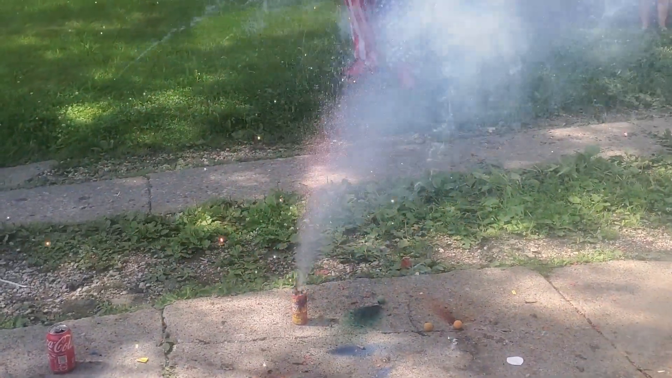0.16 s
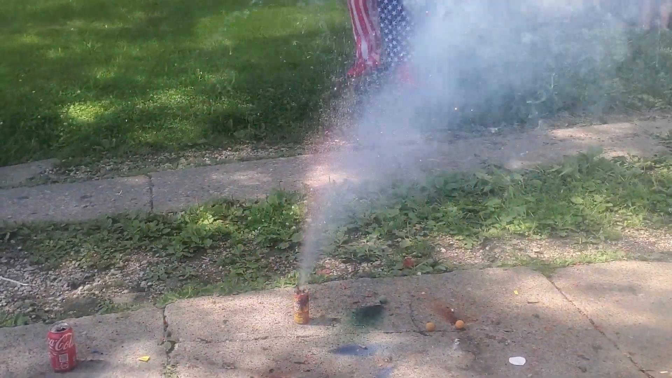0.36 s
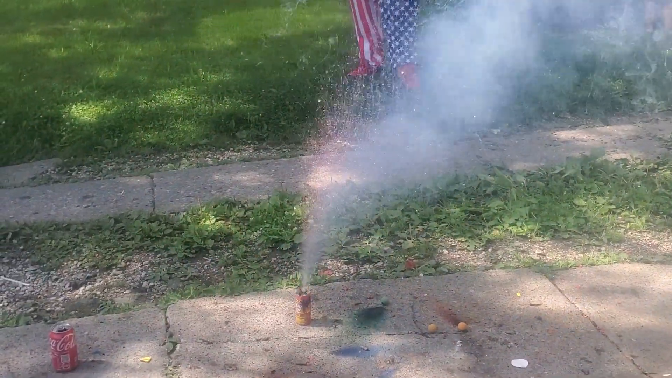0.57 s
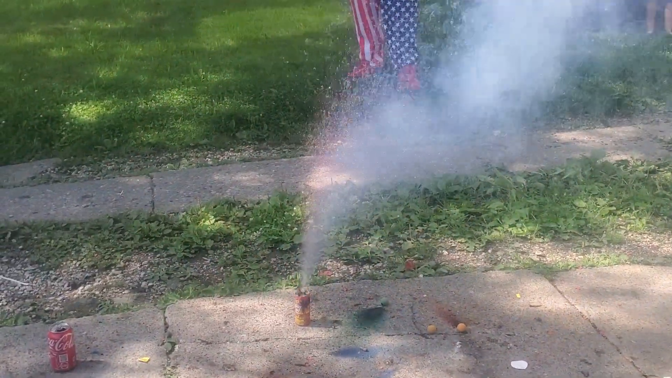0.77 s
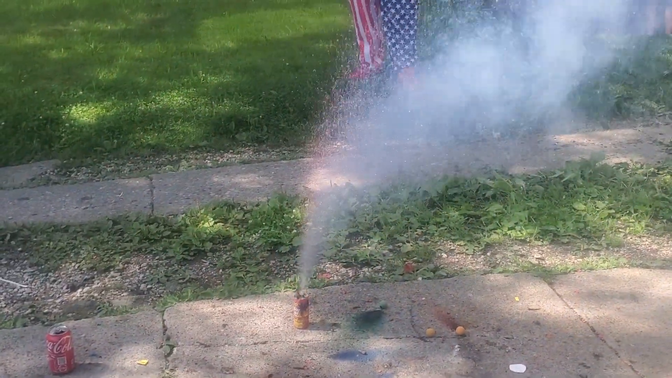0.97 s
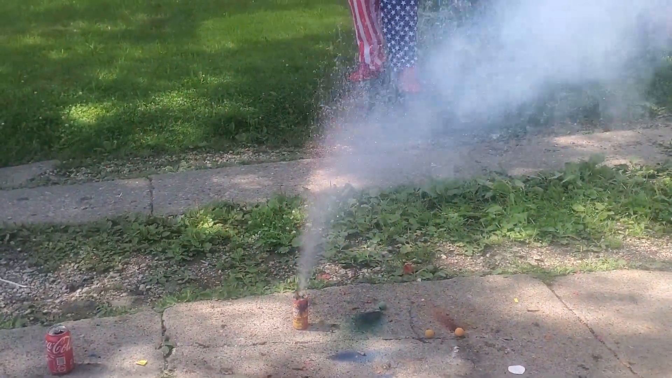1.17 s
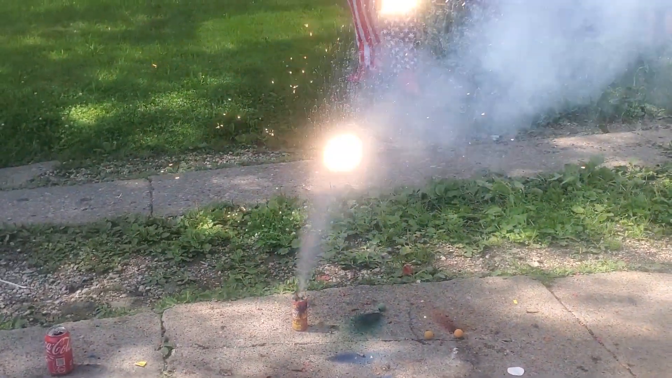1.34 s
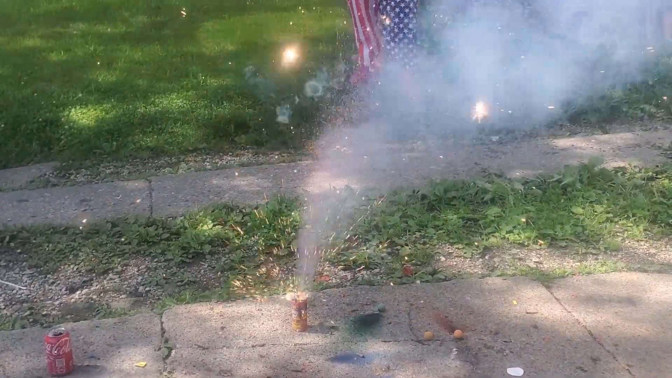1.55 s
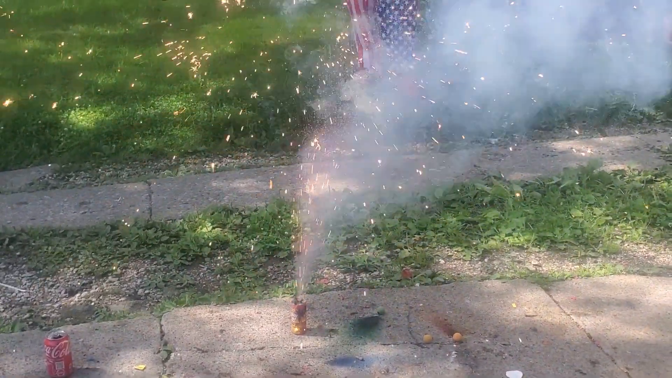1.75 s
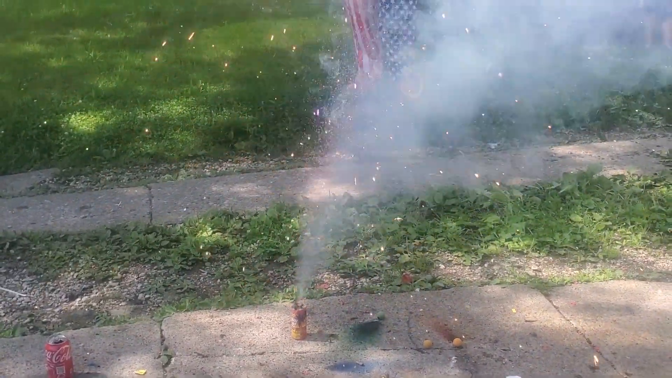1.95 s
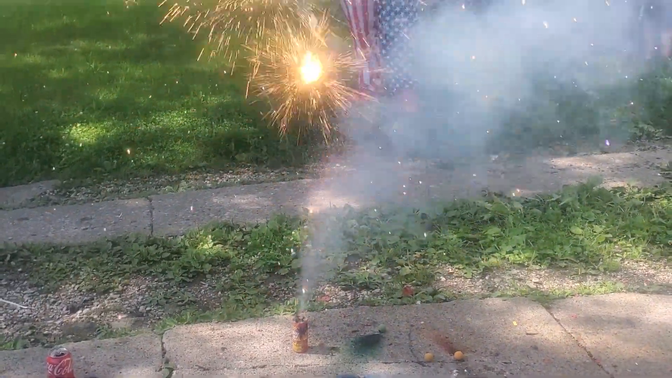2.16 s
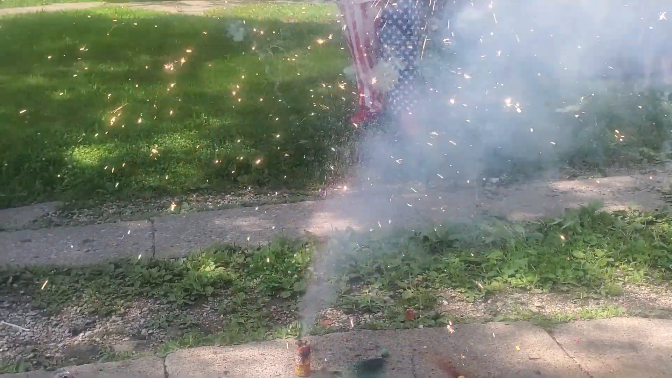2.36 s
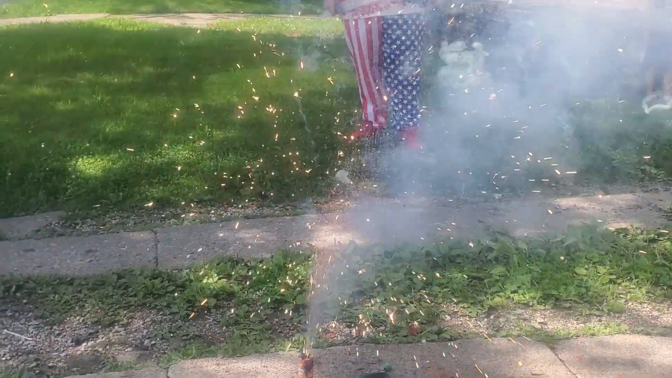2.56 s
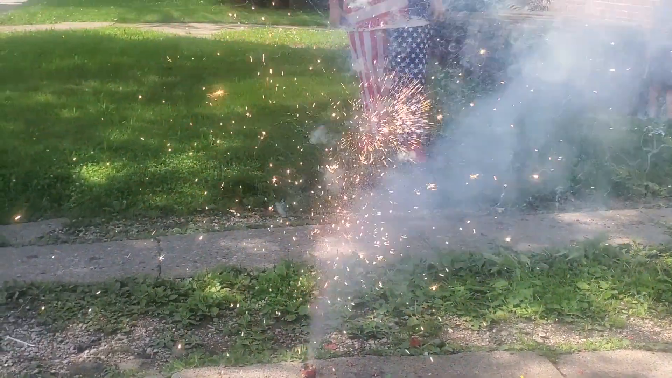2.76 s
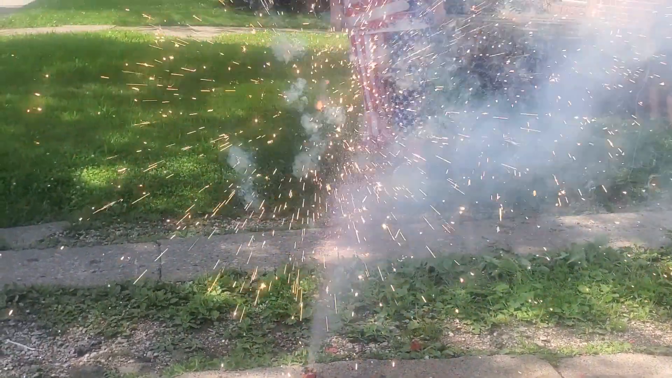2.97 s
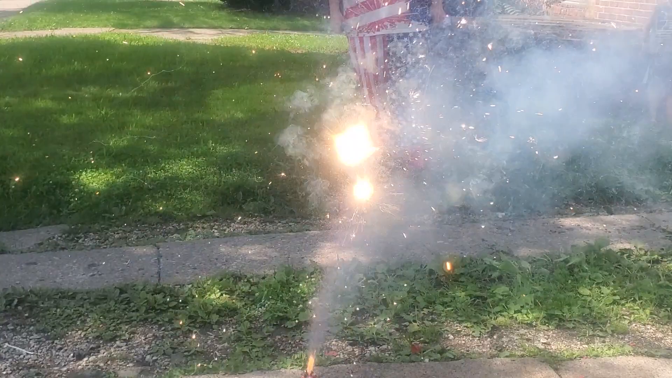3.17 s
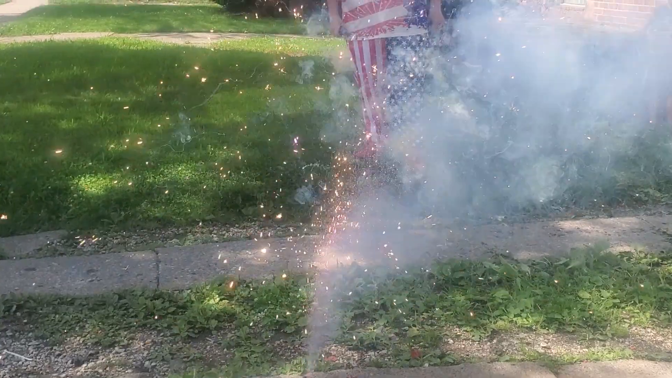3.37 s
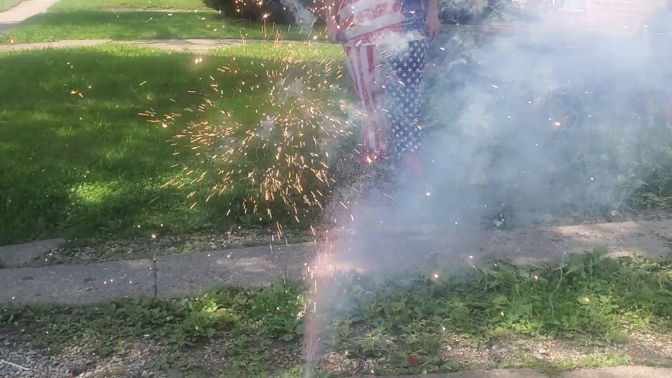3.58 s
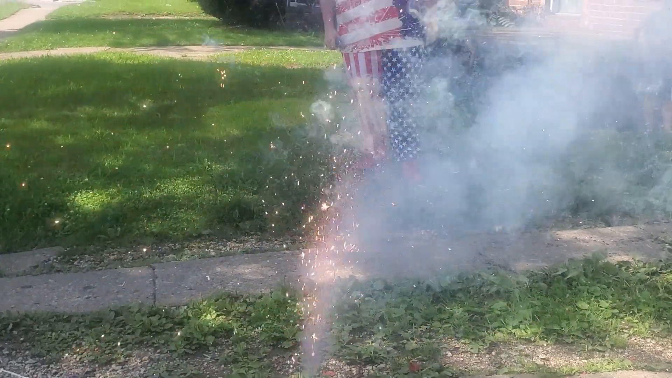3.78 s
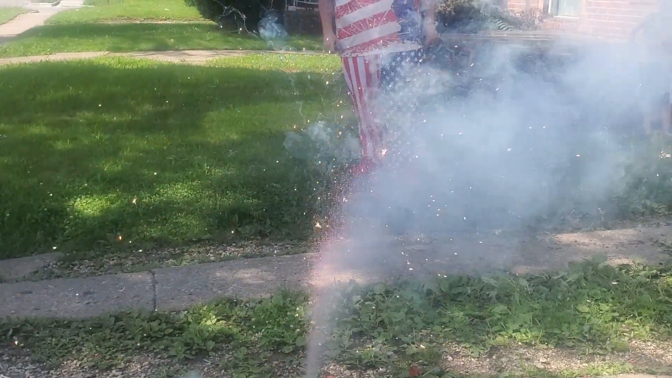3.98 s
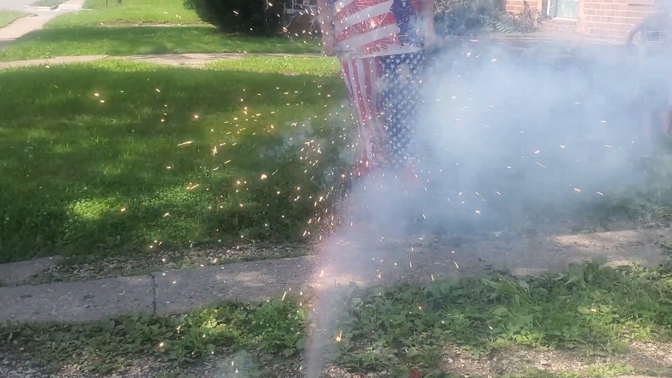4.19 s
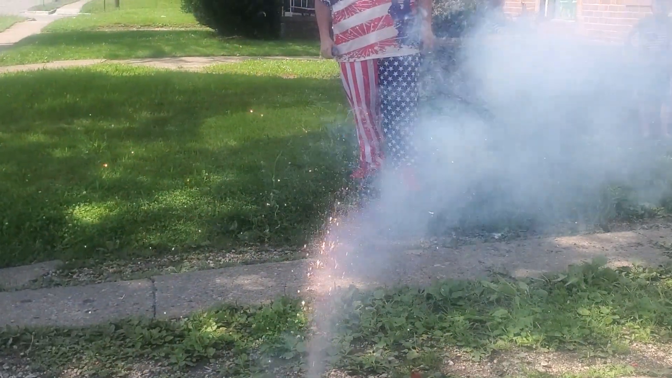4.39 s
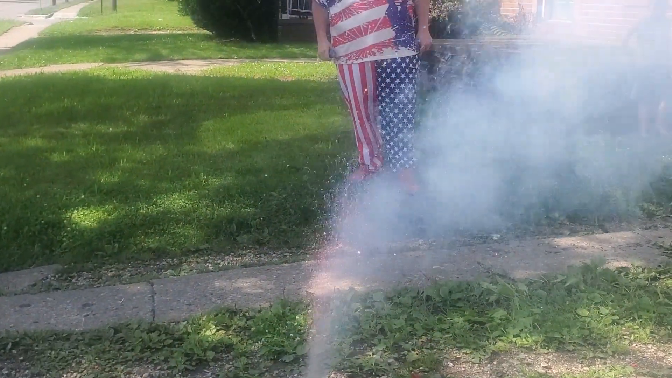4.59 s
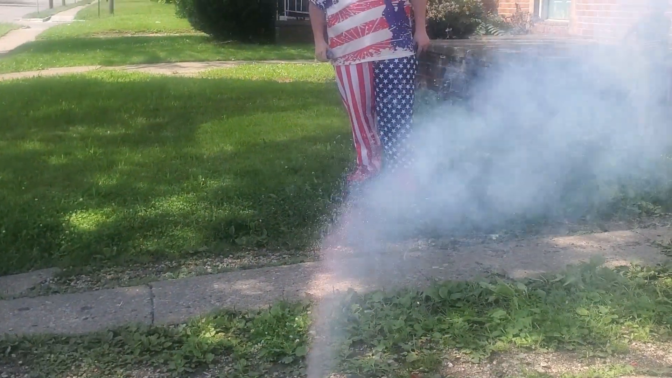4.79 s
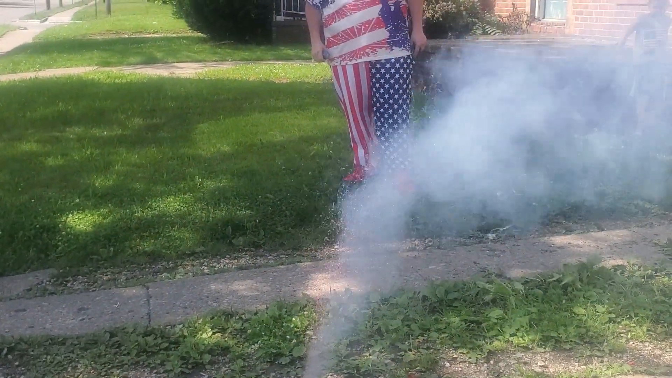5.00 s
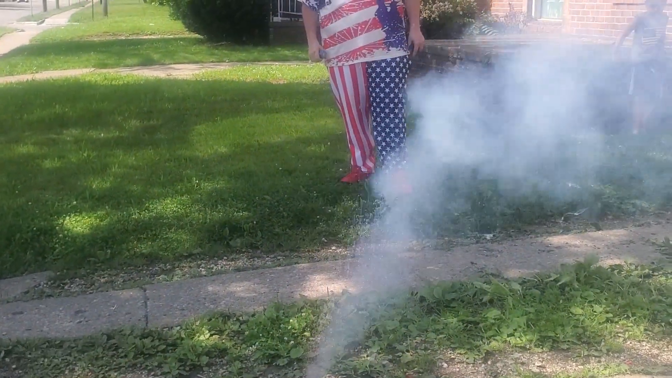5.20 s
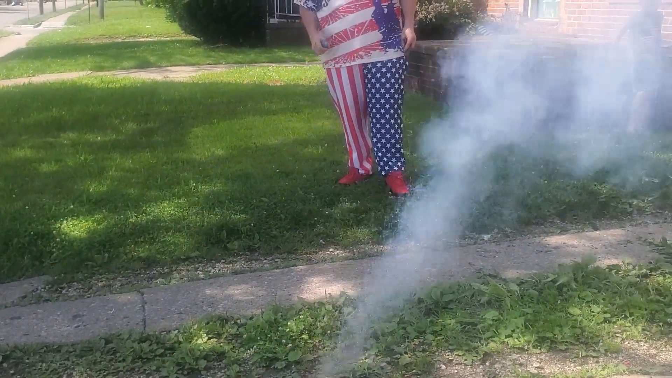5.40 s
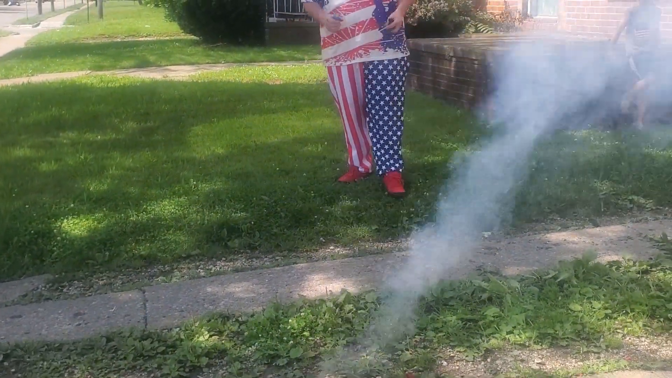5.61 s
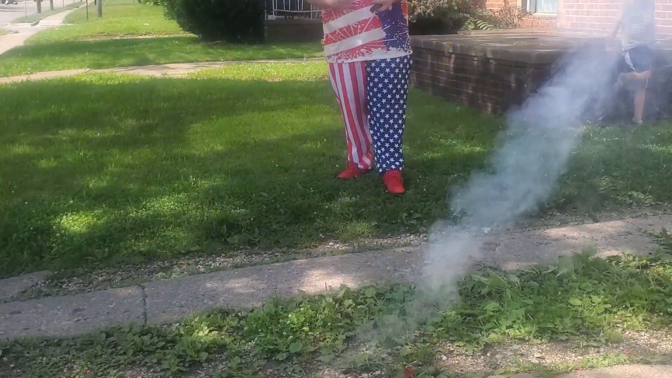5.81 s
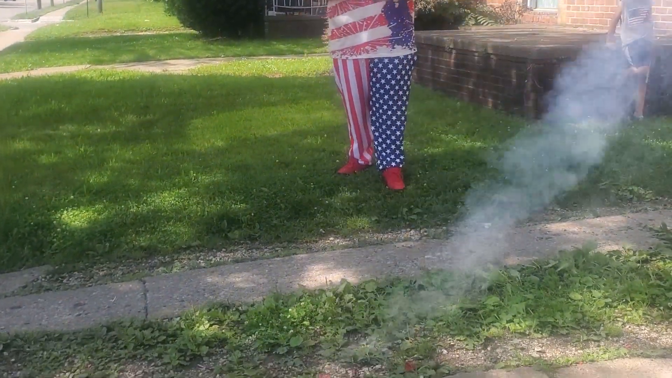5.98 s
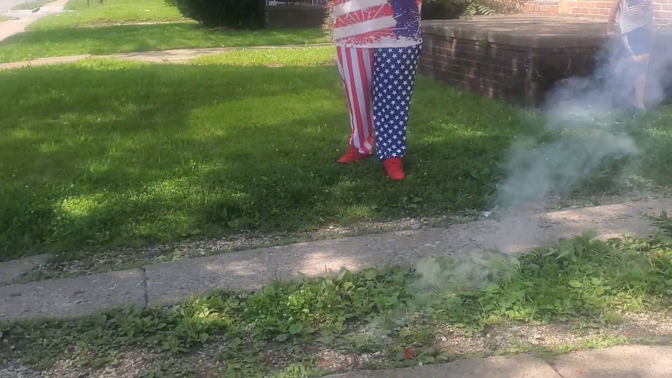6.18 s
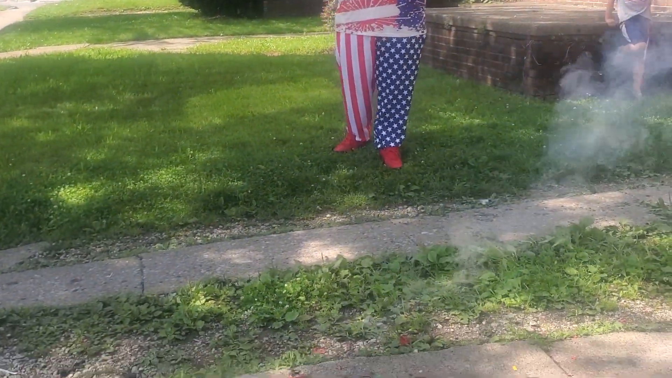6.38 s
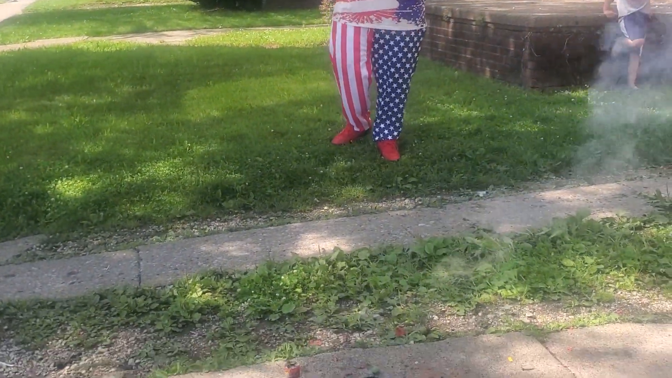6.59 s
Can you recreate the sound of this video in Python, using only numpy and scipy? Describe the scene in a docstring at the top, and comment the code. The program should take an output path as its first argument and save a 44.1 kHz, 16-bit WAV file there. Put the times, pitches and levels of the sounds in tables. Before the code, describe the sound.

Outdoors by a grassy yard, heard close on a small stereo microphone. At 0 s the tail of a pop and its tiny snaps fade into a thin, slightly sputtering gas hiss over faint street wash. Around 1.4 s the hiss jumps up, a brief vehicle hum swells beneath, and sharp, very loud star bursts begin. From 1.5 to 3.1 s they come in a dense, irregular crackling barrage, each a dry crack with a quick ground slap, scattered snaps and short yard echoes. From 3.2 s gaps widen; single pops continue until about 4.5 s. The hiss dulls, sinks after 5 s and vanishes by 5.5 s, with one faint late pop at 5.6 s. Tiny falling bird chirps sound between 5.3 and 5.9 s, with another at 6.3 s. Faint throbbing insects remain as a passing vehicle's low rumble and wavering two-tone engine hum rise from 5.5 s, strong from 5.9 s to the end at about 6.6 s.

```python
"""Small fountain firework with popping stars

A fountain firework hisses on a pavement (shaped noise) and throws up stars that burst in sharp pops
(short push and suction), each bounced by the ground and followed by small snaps and yard echoes.
Behind it are passing vehicles with two engine hums (sines), low rumble and street wash (noise),
insects (a throbbing narrow band) and a bird (sine glides).
Two microphone ports on a small housing colour the pops and the hiss differently left and right."""
import sys
import numpy as np
from scipy import signal
from scipy.fft import rfft, irfft
from scipy.io import wavfile
from scipy.ndimage import uniform_filter1d

SR = 44100
rng = np.random.default_rng(int(sys.argv[2]) if len(sys.argv) > 2 else 0)


def unload_audio(sound):
    """Save the sound as a 16-bit wav file, at the path given as the first command line argument."""
    columns = np.transpose(np.atleast_2d(sound))
    # keep every value between -1 and 1, then stretch to whole-number steps
    steps = np.round(np.clip(columns, -1, 1) * 32767)
    wavfile.write(sys.argv[1], SR, steps.astype(np.int16))


def level_to_linear(level):
    """Convert decibel levels to linear amplitude factors, elementwise."""
    exponent = np.asarray(level, float) / 20
    return 10 ** exponent


N = 293253
TIME = np.arange(N) / SR
LEAD = SR // 10  # samples played ahead of time zero, so that an earlier star leaves its tail
EDGE_HZ = 15900  # the noises and the yard echoes stop here

# loud bursting stars: t/s, level/dB before the pop is coloured, ground bounce delay/ms (longer if higher)
POPS = [(-0.03, -4.5, 1.8), (1.424, -4.5, 1.34), (1.4794, -3, 2.46), (1.5518, -9, 1.8), (1.59, -2.5, 2.04),
        (1.6146, -5, 1.73), (1.6725, -5, 1.7), (1.6822, -4, 3.7), (1.6983, -4, 1.7), (1.7077, -7.5, 2.9),
        (1.7168, -7, 1.8), (1.7385, -4, 2.31), (1.7516, -3.5, 3.9), (1.7627, -4, 1.6), (1.7945, -2, 1.6),
        (1.8029, -8.5, 3.4), (1.812, -4, 2.8), (1.817, -11.5, 2.8), (1.833, -5.5, 2.47),
        (1.859, -8.5, 2.36), (1.9045, -3.5, 1.2), (1.909, -6, 2.8), (1.9669, -7, 3), (1.9743, -6.5, 1.93),
        (1.9895, -2.5, 2.74), (2.0331, -6, 3.17), (2.0631, -8, 3.9), (2.0725, -7.5, 3.3),
        (2.0925, -6.5, 2.8), (2.1113, -7.5, 3.2), (2.125, -11, 2.1), (2.1589, -2, 3.3), (2.17, -3, 3.8),
        (2.2083, -5.5, 2.4), (2.2262, -9.5, 4), (2.2324, -6, 3.7), (2.2652, -7.5, 2.9), (2.2752, -3.5, 1.9),
        (2.2852, -1, 3.3), (2.3131, -2, 3.7), (2.3325, -4, 1.7), (2.378, -5, 3.1), (2.4028, -10, 1.5),
        (2.42, -5.5, 2.9), (2.4444, -4.5, 3.1), (2.4634, -7, 3.7), (2.49, -5.5, 3.1), (2.5513, -7, 3.7),
        (2.5635, -12.5, 2.6), (2.5775, -3.5, 3.4), (2.5957, -9, 2.9), (2.6104, -4.5, 3.7),
        (2.6389, -6, 1.8), (2.6496, -5.5, 1.56), (2.699, -2.5, 1.9), (2.7172, -8.5, 2.8), (2.7384, -7, 2),
        (2.7525, -6, 2.77), (2.7933, -7, 1.74), (2.8052, -9.5, 2.2), (2.814, -7, 1.7), (2.847, -5, 1.6),
        (2.884, -7.5, 1.7), (2.891, -8.5, 3.6), (2.9098, -8, 2.81), (2.9187, -7.5, 2.43), (2.9265, -8, 2.2),
        (2.9407, -4.5, 2.6), (2.9512, -6.5, 4.01), (2.9602, -5.5, 1.26), (2.9769, 0, 4.4),
        (2.9879, -6.5, 1.9), (3.0032, -5.5, 2.6), (3.0184, -3, 1.96), (3.0353, -5.5, 5.1), (3.051, -6, 2.8),
        (3.0666, -3, 2.8), (3.1114, -9, 2.6), (3.1403, -11, 4.2), (3.1638, -13, 2.6), (3.1729, -5, 1.73),
        (3.1995, -9.5, 3.6), (3.211, -6, 1.11), (3.276, -7.5, 3.6), (3.3087, -7, 2.2), (3.3364, -8, 1.54),
        (3.3723, -4, 2.85), (3.4108, -5, 3.14), (3.4536, -8.5, 2.1), (3.4662, -11, 2.8), (3.5203, -4, 2.04),
        (3.5577, -3, 3.1), (3.5928, -6.5, 1.3), (3.6014, -4, 4.1), (3.6762, -10, 1.9), (3.6974, -7, 1.7),
        (3.7187, -6.5, 2.5), (3.7268, -8, 1.81), (3.7452, -5.5, 2.61), (3.7472, -11, 2.3),
        (3.8167, -7.5, 1.8), (3.8285, -4, 1.85), (3.9119, -9, 2.5), (3.9395, -3, 1.41), (3.9837, -8, 2.4),
        (4.0104, -9.5, 3.8), (4.0262, -8, 2.14), (4.056, -1.5, 1.47), (4.1134, -5, 2.3), (4.2402, -8, 1.35),
        (4.2497, -7, 2.55), (4.2815, -2.5, 2.56), (4.425, -17, 1.7), (4.4695, -4.5, 4.44),
        (5.6051, -19, 1.66)]
# how alike left and right are, for the street and the yard: f/Hz, likeness (1 same, 0 unrelated, -1 opposite)
LIKENESS = [(60, 0.76), (240, 1), (950, 0.42), (3770, -0.41), (15000, 0.75)]
# two vehicles passing: t/s, level/dB of their rumble
TRAFFIC = [(0, -49), (1.1, -50), (1.4, -36), (1.7, -44.5), (4.2, -45.5), (5.25, -40.5), (5.5, -37),
           (5.9, -28), (6.65, -29)]


def evened(x):
    """Scales a signal to rms 1."""
    return x / np.sqrt(np.mean(x ** 2) + 1e-20)


def read(points, hz):
    """Reads a table of values over frequency, on a log-frequency axis."""
    f, value = np.transpose(points)
    return np.interp(np.log(hz + 1), np.log(f + 1), value)


def curve(rows, axis=1):
    """Reads one column of a table over time, at every sample."""
    return np.interp(TIME, np.transpose(rows)[0], np.transpose(rows)[axis])


def ports(hz, turn):
    """Each port sums delayed and dulled paths round the housing; the direction (turn) shifts the delays."""
    # paths from the front to each port: delay/ms, gain, top f/Hz, delay shift/ms for a turn of 1
    left_paths = [(-.068, .55, 16000, .003), (0, 1., 16000, .003)]
    right_paths = [(0.0041, 1., 6800, -0.021), (0.27, -1.104, 3270, 0.0059), (0.33, 0.53, 2900, -0.016),
                   (0.079, 0.49, 31000, -0.034)]
    responses = []
    for paths in (left_paths, right_paths):
        response = 0
        for ms, gain, top, spread in paths:
            delay = np.exp(-2j * np.pi * hz * (ms + spread * turn) / 1000)
            response = response + gain * delay / (1 + (hz / top) ** 4)
        responses.append(response)
    return np.array(responses)


def noise(spectrum, likeness, patchy_db, size=1024):
    """Makes two channels of random short-time spectra, with patches that drift in loudness."""
    hz = np.fft.rfftfreq(size, 1 / SR)
    a, b, c, d, patches = rng.standard_normal((4 * N // size + 5, len(hz), 5)).T
    patches = uniform_filter1d(patches, size=10, axis=0)  # over frequency
    patches = evened(uniform_filter1d(patches, size=8, axis=1))  # over time
    same = np.clip(read(likeness, hz), -1, 1)[:, None]
    left = a + 1j * b
    right = same * left + np.sqrt(1 - same ** 2) * (c + 1j * d)
    z = np.array([left, right])
    z *= level_to_linear(read(spectrum, hz)[:, None] + patchy_db * patches) * (hz < EDGE_HZ)[:, None]
    return hz, z


def sound(z, size=1024):
    """Turns short-time spectra back into sound of rms 1."""
    return evened(signal.istft(z, nperseg=size, noverlap=size * 3 // 4)[1][:, :N])


def bursts(rows, size=2048):
    """Each star is a blast wave (push, then suction), its duller ground bounce and a spatter of debris."""
    # colour of a pop: f/Hz, level/dB
    blast_colour = [(30, 9.5), (150, 17.5), (500, 15.5), (1500, 10), (4000, 11.5), (6300, 11.5),
                    (7500, 6.5), (9000, 10), (16000, 3.5)]
    ground_db, ground_spread_db = -3.5, 1  # bounce against the direct pop, and how much it varies
    s, db, bounce_ms = np.transpose(rows)[:, :, None]
    turn, tilt, stretch, ground = rng.standard_normal((len(rows), 4, 1)).transpose(1, 0, 2)
    hz, t = np.fft.rfftfreq(size, 1 / SR), np.arange(size) / SR

    def late(ms):
        """A delay turns the phase in step with frequency."""
        return np.exp(-2j * np.pi * hz * ms / 1000)

    suction_ms = .113 * np.exp(.14 * stretch)
    blast = (1 - .6 * late(suction_ms)) * late(20) * level_to_linear(read(blast_colour, hz))
    bounce_gain = level_to_linear(ground_db + ground_spread_db * ground.clip(-2, 2))
    bounce = bounce_gain * late(bounce_ms) / (1 + 1j * hz / 11000)
    from_below = ports(hz, tilt - 1.5)  # the bounce comes from another direction

    fade = level_to_linear(-24 - 60 * t / 0.036) * (t > .0003)
    debris = rng.standard_normal((len(rows), 2, size)) * fade
    # grit carries no bass
    spatter = rfft(debris).transpose(1, 0, 2) * ports(hz, -turn) * hz / (hz - 700j)

    waves = level_to_linear(db) * irfft(blast * (ports(hz, turn) + bounce * from_below + spatter))
    out = np.zeros((2, LEAD + N + size))
    # each pop sits 20 ms into its frame
    at = np.round((s - .02) * SR).astype(int) + LEAD + np.arange(size)
    for channel in range(2):
        np.add.at(out[channel], at, waves[channel])
    return out[:, :LEAD + N]


def small_stars(count=5):
    """Each star throws burning crumbs that snap at random moments soon after it."""
    shortest_s, further_lag_s = .005, .022  # least lag, and the mean of the random lag added to it
    crackle_db = (-25, -11)  # softest and loudest crumb against its star
    crackle_rarity = 4.7  # the higher this power, the rarer the loud crumbs
    bounce_range_ms = (1.2, 4.2)  # from the lowest to the highest crumb
    lag, strength, height = rng.random((len(POPS), count, 3)).T
    s, db = np.transpose(POPS)[:2]
    rows = [s + shortest_s - further_lag_s * np.log(1 - lag),
            db + np.interp(strength ** crackle_rarity, (0, 1), crackle_db),
            np.interp(height, (0, 1), bounce_range_ms)]
    return np.reshape(rows, (len(rows), -1)).T


def yard(x, tail_db=-13):
    """Adds echoes smeared by brick and leaves, and a sparse tail that dies band by band."""
    # walls and foliage: delay/ms, level/dB before the final tone tilt, smear/ms
    walls = [(12.2, -22, 1), (22.8, -19, 1), (27, -17, 22)]
    # how long the tail lasts: f/Hz, time to fall by 60 dB/s
    tail_times = [(300, 0.12), (1500, 0.16), (5000, 0.9), (9000, 0.4), (15000, 0.44)]
    # one click of random sign at a random place in every 20 samples
    taps = np.zeros((2, SR // 2))
    at = np.arange(200, SR // 2 - 20, 20) + rng.integers(0, 20, (2, (SR // 2 - 201) // 20))
    np.put_along_axis(taps, at, rng.choice([-1., 1.], at.shape), 1)
    hz, t, z = signal.stft(taps, SR, nperseg=256)
    fade = level_to_linear(-60 * t / read(tail_times, hz)[:, None])
    tail = signal.istft(z * fade, SR, nperseg=256)[1]
    tail *= level_to_linear(tail_db) / np.linalg.norm(tail[0])

    for ms, db, smear_ms in walls:
        smear = np.exp(-np.arange(3000) / SR * 1000 / smear_ms)
        echo = rng.standard_normal((2, len(smear))) * smear / np.linalg.norm(smear)
        tail[:, round(ms * SR / 1000):][:, :len(smear)] += level_to_linear(db) * echo

    hz = np.fft.rfftfreq(tail.shape[1], 1 / SR)
    # sound from the sides enters the ports brighter
    brighter = level_to_linear(read([(6000, -1), (12000, 1.5)], hz))
    left, right = rfft(tail) * (hz < EDGE_HZ) * brighter
    same = np.clip(read(LIKENESS, hz), -1, 1)  # long waves reach both ports alike
    tail = irfft([left, same * left + np.sqrt(1 - same ** 2) * right])
    return signal.fftconvolve(x, tail, axes=1)[:, :LEAD + N]


def jet():
    """Burning gas hisses out of the nozzle in front of the ports, sputtering a little as it flows."""
    # colour of the hiss before the ports: f/Hz, relative level/dB per Hz
    hiss_colour = [(500, -8.5), (860, -6.5), (970, -32.5), (1080, -9), (1380, -18.5), (2000, -4.5),
                   (2550, -1), (2900, -2.5), (3200, 2), (3500, -5), (3800, 2.5), (4100, -5), (4600, -9.5),
                   (5800, 0.5), (7450, -18.5), (8600, -15.5), (10500, -20), (13000, -15.5), (15500, -19)]
    # loudness of the hiss before sputter: t/s, level/dB
    hiss_level = [(0, -41), (.3, -47), (1.1, -42), (1.4, -31.5), (1.7, -37), (3.2, -39), (4.2, -43.5),
                  (4.6, -43), (5.08, -47), (5.25, -62), (5.5, -79)]
    dull_from_s, dull_db = 3.24, -3  # the dying jet loses treble: dB per second and octave above 3000 Hz
    hz, z = noise(hiss_colour, [(100, 1.0), (2000, 0.81), (15000, 0.34)], patchy_db=1.35)
    sputter = evened(uniform_filter1d(rng.standard_normal(N), size=30))
    dying_s = np.maximum(np.linspace(0, N / SR, z.shape[2]) - dull_from_s, 0)
    octaves = np.log2(np.maximum(hz / 3000, 1))[:, None]
    z = z * level_to_linear(dull_db * octaves * dying_s)
    return sound(z * ports(hz, 0)[:, :, None]) * level_to_linear(curve(hiss_level) + 1.6 * sputter)


def hums():
    """Two engine tones waver in pitch and level, with further tones at sums and multiples of their pitch."""
    # engine hums of both passes: t/s, f/Hz, level/dB before wavering and the lean to the left
    low_hum = [(.8, 61, -63), (1.4, 66.1, -38), (1.8, 70.1, -67), (4.1, 85.8, -65), (4.2, 86, -49),
               (4.45, 75, -42.5), (5.5, 74.88, -38), (6.0, 76.86, -20.5), (6.15, 78.05, -22.5),
               (6.25, 77.4, -39), (6.65, 79.6, -46.5)]
    high_hum = [(.8, 101, -57), (1.25, 101.8, -42.5), (1.42, 103.6, -30), (1.65, 103.2, -84),
                (4.2, 124, -75), (4.4, 119, -44), (5.35, 118, -42.5), (5.9, 124.2, -26.5), (6.55, 124, -21),
                (6.65, 122.2, -23.5)]
    # further tones: times the low f, times the high f, level/dB against the high hum
    overtones = [(1, 1, -16.5), (0, 2, -21), (1, 2, -22.5)]
    turns, levels = [], []
    for hum in (low_hum, high_hum):
        waver = evened(uniform_filter1d(rng.standard_normal((2, N)), size=2500, axis=1))
        hz = curve(hum) + .8 * waver[0]
        turns.append(2 * np.pi * np.cumsum(hz) / SR)
        levels.append(np.sqrt(2) * level_to_linear(curve(hum, axis=2) + 0.32 * waver[1]))  # rms to peak
    mixed = sum(level_to_linear(db) * np.sin(round(m) * turns[0] + round(n) * turns[1]) for m, n, db in overtones)
    both = levels[0] * np.sin(turns[0]) + levels[1] * (np.sin(turns[1]) + mixed)
    return both * level_to_linear([[.7], [-.7]])  # slightly louder on the left


def rumble():
    """Lumpy low traffic noise, nearly the same at both ports."""
    # colour of the rumble: f/Hz, relative level/dB per Hz
    rumble_colour = [(20, -37), (50, -8.5), (100, -1), (250, -21), (400, -86)]
    z = noise(rumble_colour, [(20, 0.94), (400, 0.96)], patchy_db=3.0, size=4096)[1]
    return sound(z, size=4096) * level_to_linear(curve(TRAFFIC))


def street():
    """Far wash from all sides swells with the traffic; a throbbing narrow band in it stands for insects."""
    # colour of the wash before the lean and the insects: f/Hz, relative level/dB per Hz
    wash_colour = [(88, -33), (150, -5), (260, -9.5), (378, -16), (991, -20.5), (2600, -26), (3770, -31),
                   (6200, -47), (7400, -73), (9500, -58.5), (13800, -58), (15900, -62.5)]
    # lean of the wash: f/Hz, left minus right level/dB
    side_lean = [(60, 5.5), (240, 2), (950, 0), (3770, 0), (15000, 22)]
    wash_db, wash_share = -14, 0.82  # the wash follows the traffic by this share of its dB
    hz, z = noise(wash_colour, LIKENESS, patchy_db=0.84)
    lean = level_to_linear(read(side_lean, hz) / 2)[:, None]
    throb = evened(uniform_filter1d(rng.standard_normal(z.shape[2]), size=3))
    insects = level_to_linear(6.0 + 2.0 * throb) / (1 + ((hz[:, None] - 3200.) / 55.0) ** 2)
    wash = sound(z * [lean, 1 / lean] * (1 + insects))
    return wash * level_to_linear(wash_db + wash_share * curve(TRAFFIC))


def bird():
    """Each chirp is a short sine gliding in pitch, off to the left."""
    # chirps: t/s, length/s, start f/Hz, end f/Hz, peak level/dB before the lean to the left
    chirps = [(5.317, .018, 7000, 4700, -65), (5.465, .028, 6200, 4600, -65), (5.765, .02, 6800, 4200, -61),
              (5.918, .028, 6200, 4500, -61), (6.325, .02, 3300, 3600, -56)]
    out = np.zeros(N)
    for s, length, start_hz, end_hz, db in chirps:
        hz = np.linspace(start_hz, end_hz, round(length * SR))
        glide = np.sin(2 * np.pi * np.cumsum(hz) / SR) * signal.windows.tukey(len(hz), .5)
        out[round(s * SR):][:len(hz)] += level_to_linear(db) * glide
    return out * level_to_linear([[2], [-2]])


def scene():
    """Pops and their yard echoes over jet, engines, traffic, street and bird."""
    pops = bursts(np.vstack([POPS, small_stars()]))
    echoed = (pops + yard(pops))[:, LEAD:]
    return echoed + jet() + hums() + rumble() + street() + bird()


def band_limit(x):
    """A steep low-pass at the top of the band."""
    return signal.sosfilt(signal.butter(12, 17000, fs=SR, output="sos"), x)


def record(dry):
    """The loudest peaks round off smoothly towards full scale."""
    rounded = dry / (1 + abs(dry) ** 6) ** (1 / 6)
    return band_limit(rounded)


dry = scene()
out = record(dry)
unload_audio(out)
```